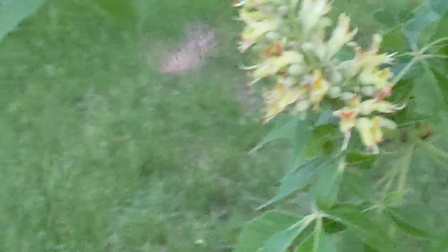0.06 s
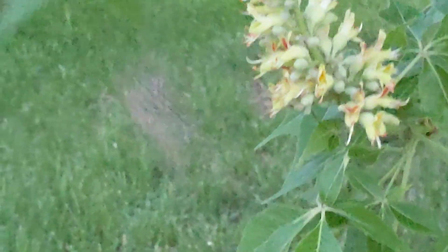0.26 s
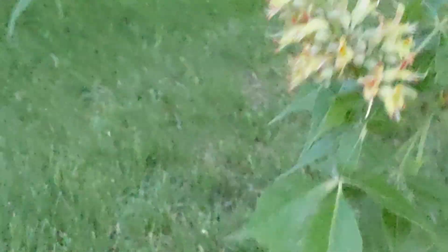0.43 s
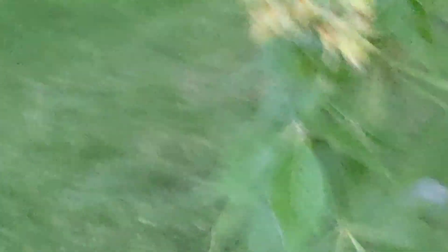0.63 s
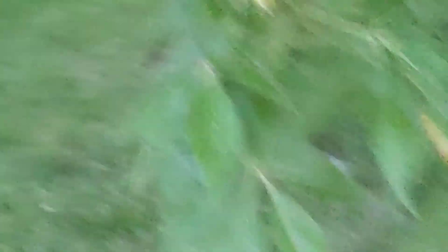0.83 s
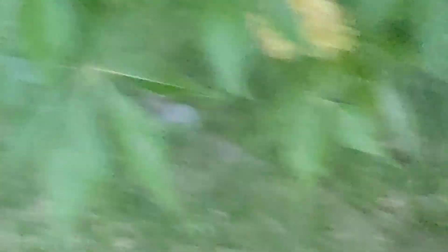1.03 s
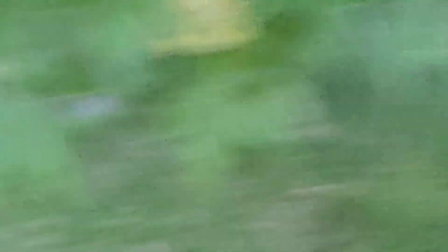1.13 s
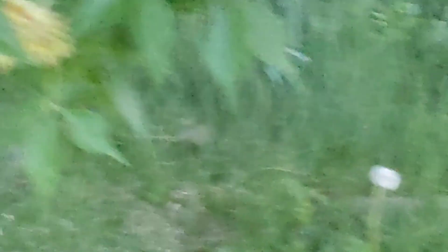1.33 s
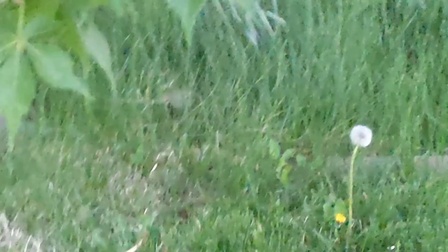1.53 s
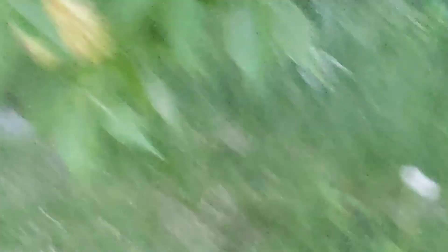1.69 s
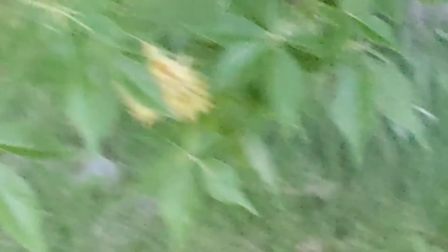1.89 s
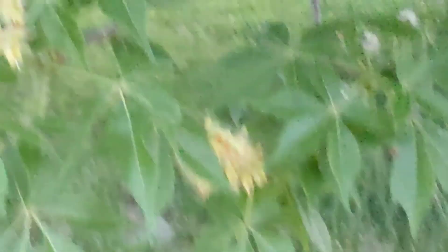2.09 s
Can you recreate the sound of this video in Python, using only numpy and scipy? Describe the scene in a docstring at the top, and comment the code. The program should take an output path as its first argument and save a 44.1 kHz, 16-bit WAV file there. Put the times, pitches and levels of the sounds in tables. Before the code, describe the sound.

A handled camera clicks sharply once, followed by quiet outdoor rumble and small bird chirps.

```python
"""A finger rubs on a hand-held camera, over the low rumble and hiss of a distant outdoors.
It knocks the case, which rings with a sharp click and two rebounds, loudest on the left.
The rubbing dies away among small ticks of the grip, two soft swishes and a low shake of the hand.
Small birds chip in short runs: each note is a falling whistle that the trees scatter into an echo."""
import sys
import numpy as np
from scipy import signal
from scipy.fft import rfft, irfft
from scipy.io import wavfile

SR = 44100
rng = np.random.default_rng(int(sys.argv[2]) if len(sys.argv) > 2 else 0)


def bounce(signal):
    """Save signal as a 16-bit WAV file at the path given by the first command-line argument."""
    frames = np.transpose(np.atleast_2d(signal))
    limited = np.clip(frames, -1, 1)
    pcm = np.round(limited * 32767).astype(np.int16)
    wavfile.write(sys.argv[1], SR, pcm)


N = 94815
T = np.arange(N) / SR
HZ = np.maximum(np.fft.rfftfreq(N, 1 / SR), 1)


def from_db(db):
    """Turn decibels into a number to multiply by."""
    return 10 ** (np.asarray(db) / 20)


def pan(left_louder_db):
    """Left and right gains that place a sound to one side."""
    return from_db(np.array([[.5], [-.5]]) * left_louder_db)


def rms_one(x):
    """Scale a sound so its average level (rms) is 1."""
    return x / np.sqrt(np.mean(x ** 2) + 1e-20)


def over_hz(points):
    """Join a table's points into a curve over all pitches."""
    hz, value = np.transpose(points)
    return np.interp(np.log(HZ), np.log(hz), value)


def soften(x, hz, order):
    """Dull a sound by turning down what lies above hz."""
    return signal.sosfilt(signal.butter(order, min(hz, .45 * SR), fs=SR, output="sos"), x + 1e-18)


def resonate(x, hz, width_hz):
    """Make a sound ring at one pitch; a narrow width rings longer."""
    r = np.exp(-np.pi * width_hz / SR)
    feedback = [1, -2 * r * np.cos(2 * np.pi * hz / SR), r * r]
    return signal.lfilter(np.array([1, 0, -1]) * (1 - r * r) / 2, feedback, x + 1e-18)


def burst(start_s, fade_s):
    """A puff of noise with energy 1 that drops 60 dB in fade_s."""
    fade = from_db(-60 * np.clip((T - start_s) / fade_s, 0, 4))
    puff = rng.standard_normal(N) * (T >= start_s) * fade
    return puff / np.sqrt(np.sum(puff ** 2))


def swells(rows):
    """Smooth, bell-shaped rises and falls in level."""
    return sum(from_db(db) * np.exp(-((T - peak_s) / half_s) ** 2) for peak_s, half_s, db in rows)


def stereo_noise(colour, balance, likeness):
    """Shaped noise for two ears; likeness 1 means they move together, 0 that they are unrelated."""
    shared, opposed = rfft(rng.standard_normal((2, N)))
    alike = np.clip(over_hz(likeness), -1, 1)
    both = np.sqrt(1 + alike) * shared + np.sqrt(1 - alike) * opposed * np.array([[1], [-1]])
    noise = irfft(both * from_db(over_hz(colour)) * pan(over_hz(balance)), N)
    return noise / np.std(noise.mean(axis=0))


# How loud the rubbing is: time_s, level_db
RUB_LEVELS = [(0, -64), (0.12, -67), (0.19, -57), (0.26, -52.5), (0.33, -55.5), (0.39, -59), (0.46, -56),
              (0.52, -64), (0.66, -71), (0.86, -70), (0.98, -74), (1.1, -76.5), (2.15, -78.5)]
# Its tone, from low to high: pitch_hz, relative_db
RUB_COLOUR = [(250, -62), (420, -11), (800, -12), (1250, -13), (1580, -4.5), (1900, -8), (3100, -6.5),
              (4400, -15.5), (5700, -8.5), (6700, -17.5), (8400, -17.5), (9700, -7.5), (11000, -13.5),
              (11900, -11), (13000, -16), (16000, -10.5)]
# Which side it is on: pitch_hz, left_louder_db
RUB_BALANCE = [(200, 8), (700, 10.5), (1290, 5.5), (2380, 6), (4400, 1), (8120, 13.5), (15000, -0.5)]
# How alike the two sides are: pitch_hz, likeness
RUB_LIKENESS = [(60, 0.92), (240, 0.96), (950, 0.98), (3770, -0.0024), (15000, -0.08)]
# The squeak that sinks as the finger slides: time_s, pitch_hz
SQUEAK_PITCH = [(0.26, 5900), (0.45, 5470)]

def finger_rub():
    """Skin catches and slips on the case, making a grainy hiss with a faint squeak."""
    grains_per_s, grain_db = 180, 1
    catches = np.interp(T * grains_per_s, np.arange(4000), rng.standard_normal(4000))
    level_db = np.interp(T, *np.transpose(RUB_LEVELS)) + grain_db * catches
    phase = 2 * np.pi * np.cumsum(np.interp(T, *np.transpose(SQUEAK_PITCH))) / SR
    # Random wobbles roughen the tone into a band of noise 230 Hz wide.
    wobble_a, wobble_b = soften(rng.standard_normal((2, N)), 230 / 2, order=2)
    rough_tone = rms_one(wobble_a * np.cos(phase) + wobble_b * np.sin(phase))
    squeak = from_db(-16.5) * pan(left_louder_db=15) * rough_tone
    return from_db(level_db) * (stereo_noise(RUB_COLOUR, RUB_BALANCE, RUB_LIKENESS) + squeak)


# The tone of the distant rumble and hiss: pitch_hz, relative_db
AIR_COLOUR = [(12, -23.5), (22, -1), (48, 0), (100, -1), (160, -11.5), (230, -10), (320, -14.5), (450, -17),
              (650, -18), (920, -16.5), (1450, -26), (2100, -41.5), (3600, -34), (4800, -33), (5800, -33.5),
              (6600, -38), (9800, -40), (10900, -43.5), (11900, -37), (16000, -41)]
# Which side it is on: pitch_hz, left_louder_db
AIR_BALANCE = [(60, 2.5), (110, 2), (200, 8.5), (380, 10), (700, 9), (1290, 10.5), (2380, 4.5), (4400, 4),
               (8120, 10.5), (15000, 14)]
# How alike the two sides are: pitch_hz, likeness
AIR_LIKENESS = [(60, 0.99), (130, 0.7), (290, 0.17), (640, .15), (1410, 0.27), (3100, .05)]
# The hum of far engines: pitch_hz, width_hz, level_db
ENGINE_HUMS = [(108.3, 4.7, -72), (140, 29, -68.5), (210.2, 18, -76.5), (315.4, 5.6, -76)]

def outdoors():
    """Steady rumble and hiss, with the wavering drone of far engines."""
    drone = sum(from_db(db) * rms_one(resonate(rng.standard_normal(N), hz, width_hz))
                for hz, width_hz, db in ENGINE_HUMS)
    return from_db(-60.5) * stereo_noise(AIR_COLOUR, AIR_BALANCE, AIR_LIKENESS) + drone


# The knock and its rebounds, with how hard each drives five groups of case tones:
# start_s, thump_db, low_db, middle_db, high_db, top_db, brightness_hz, rattle_db, rattle_fade_s
HITS = [(0.216, 9, 17.5, 15.5, 14, 18, 17940, -13.5, 0.075), (0.2251, 19, 21.5, 4, 1, 23, 8000, -15, 0.057),
        (0.2336, -10, -14, -5, -4.5, 1, 9400, 7, 0.012)]
# The tones the case rings with: pitch_hz, width_hz, gain_db, right_louder_db
CASE_TONES = [(245, 190, -9.5, -7), (560, 145, -10.5, -11.5), (1040, 590, -9.5, -7.5),
              (1820, 280, -5, -9.5), (2416, 380, -1.5, -4), (3400, 780, -1, -6.5), (4200, 1500, -3, -10.5),
              (5570, 590, 5.5, -9.5), (10140, 330, -11, -26), (12000, 350, -25.5, 11.5),
              (14200, 900, -22.5, -3.5)]
# The group of each tone: 0 thump, 1 low, 2 middle, 3 high, 4 top
TONE_GROUP = [0, 1, 1, 1, 2, 2, 2, 3, 4, 4, 4]

def case_knock():
    """Each hit is a click and a short rattle that set the case ringing briefly."""
    drive = np.zeros((5, N))
    for k, (start_s, *group_db, brightness_hz, rattle_db, rattle_fade_s) in enumerate(HITS):
        hit = from_db(rattle_db) * soften(burst(start_s, rattle_fade_s), hz=7000, order=1)
        hit[int(start_s * SR)] += (-1) ** k  # each click kicks the opposite way to the last
        drive += from_db(group_db)[:, None] * soften(hit, brightness_hz, order=2)
    ring = np.zeros((2, N))
    for k, (hz, width_hz, db, right_louder_db) in enumerate(CASE_TONES):
        gains = from_db([[db], [db + right_louder_db]])
        ring += (-1) ** k * gains * resonate(drive[TONE_GROUP[k]], hz, width_hz)
    right_early_s = .00007  # the click reaches the right microphone first
    return np.array([ring[0], np.roll(ring[1], -round(right_early_s * SR))])


# Light ticks of the grip: start_s, strength_db, pitch_hz, width_hz
GRIP_TICKS = [(0.5889, -19, 1850, 1180), (0.882, -29, 3020, 1500), (0.971, -26.5, 2170, 1300),
              (0.974, -36, 5240, 3000), (1.714, -40, 4500, 8750)]

def grip_ticks():
    """The grip slips a little, making tiny bursts that die at once."""
    ticks = np.zeros(N)
    for start_s, db, hz, width_hz in GRIP_TICKS:
        slip = burst(start_s, fade_s=0.01)
        ticks += from_db(db) * resonate(resonate(slip, hz, width_hz), hz, width_hz)
    return pan(left_louder_db=9) * ticks


# The birds' notes: start_s, pitch_hz, fall_hz, direct_db, echo_db
BIRD_NOTES = [(0.698, 4480, 140, -71, -82), (0.736, 4690, 420, -64, -63), (0.788, 4690, 420, -65, -58.5),
              (0.845, 4720, 420, -64, -65), (1.043, 4350, 401, -79, -71.5), (1.232, 4840, 553, -76, -68),
              (1.274, 4940, 543, -73, -67), (1.318, 4940, 556, -70.5, -69), (1.702, 4420, 130, -68, -73.5),
              (1.743, 4620, 540, -65, -64.5), (1.796, 4640, 540, -67, -62.5),
              (1.853, 4670, 620, -66.5, -65.5), (2.051, 4810, 450, -74.5, -71),
              (2.130, 4880, 450, -75.5, -66.5)]

def birds():
    """Short whistles bend downward; trees scatter them into an echo, which wins for far birds."""
    note_s, fall_curve, octave_db = 0.025, 2.2, -14
    direct, scattered = np.zeros((2, N))
    for start_s, hz, fall_hz, direct_db, echo_db in BIRD_NOTES:
        progress = np.clip((T - start_s) / note_s, 0, 1)
        phase = 2 * np.pi * np.cumsum(hz - fall_hz * progress ** fall_curve) / SR
        swell = np.sin(np.pi * progress)
        whistle = np.sin(phase) + from_db(octave_db) * np.sin(2 * phase)
        direct += from_db(direct_db) * swell * whistle
        scattered += from_db(echo_db) * swell * np.sin(phase)
    echoes = np.array([signal.fftconvolve(scattered, burst(0, fade_s=.3))[:N] for _ in range(2)])
    return pan(left_louder_db=4) * (direct + echoes)


# Soft swishes, as of a sleeve: peak_s, half_length_s, level_db
SWISHES = [(0.86, 0.11, -69), (1.524, 0.069, -64.5)]
# Their tone: pitch_hz, relative_db
SWISH_COLOUR = [(2000, -44), (4000, -11), (6000, -9), (8000, -5.5), (11000, -0.5), (14000, -2),
                (16000, -3.5)]
# Which side they are on: pitch_hz, left_louder_db
SWISH_BALANCE = [(4000, 6), (9000, 10.5), (15000, 2)]
# How alike the two sides are: pitch_hz, likeness
SWISH_LIKENESS = [(4000, .4), (15000, 0.16)]

def swishes():
    """Smooth brushing makes a bright hiss that swells and fades."""
    return swells(SWISHES) * stereo_noise(SWISH_COLOUR, SWISH_BALANCE, SWISH_LIKENESS)


# The shake of the hand: peak_s, half_length_s, level_db
HAND_SHAKE = [(1.51, 0.1, -67.5)]

def hand_shake():
    """The moving hand shakes the camera: a low rumble, the same on both sides."""
    return swells(HAND_SHAKE) * rms_one(resonate(rng.standard_normal(N), hz=57.3, width_hz=50))


def scene():
    """Add the close sounds of the hand to the birds and the distant rumble."""
    return finger_rub() + outdoors() + case_knock() + grip_ticks() + birds() + swishes() + hand_shake()


def record(dry):
    """Cut away the very highest treble."""
    cutoff_hz = 15900
    return signal.sosfilt(signal.ellip(10, .1, 70, cutoff_hz, fs=SR, output="sos"), dry)


dry = scene()
out = record(dry)
bounce(out)
```